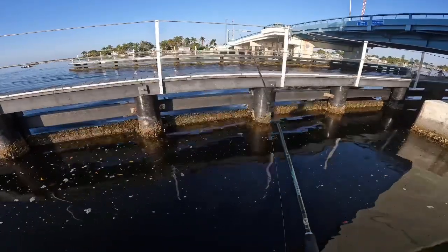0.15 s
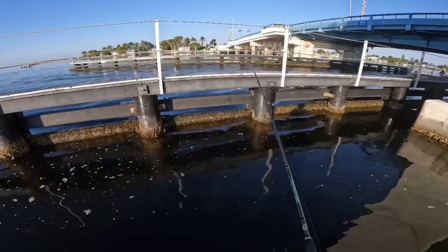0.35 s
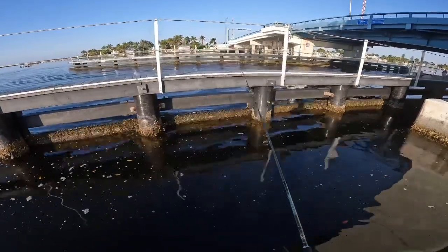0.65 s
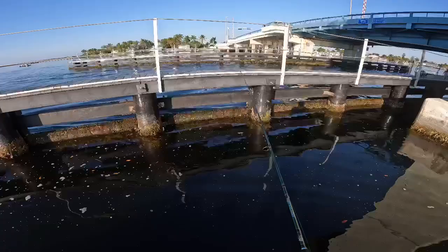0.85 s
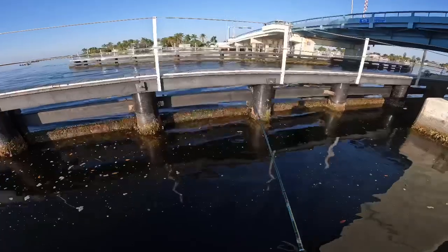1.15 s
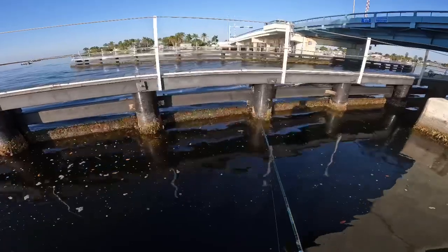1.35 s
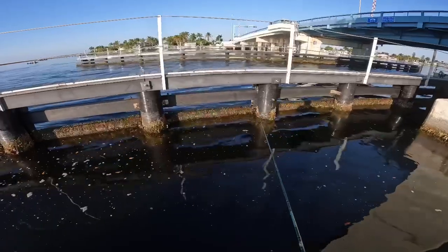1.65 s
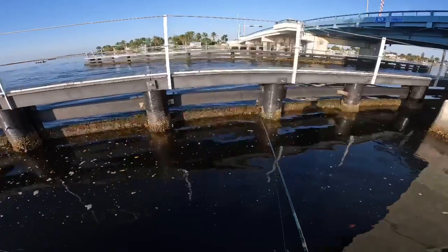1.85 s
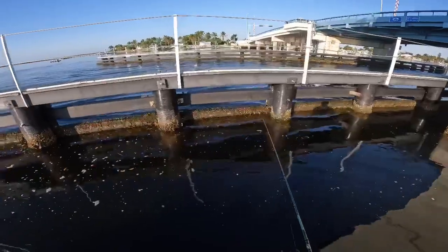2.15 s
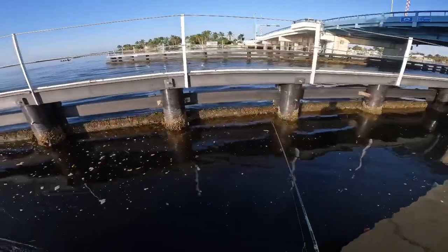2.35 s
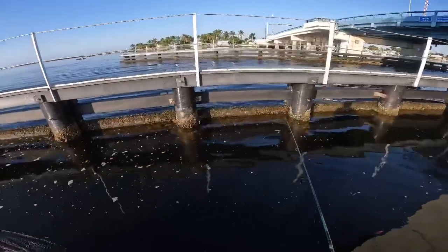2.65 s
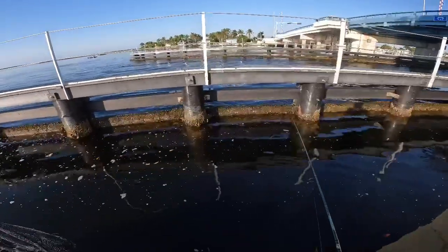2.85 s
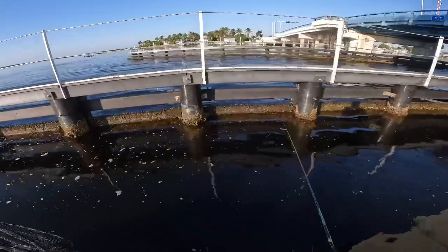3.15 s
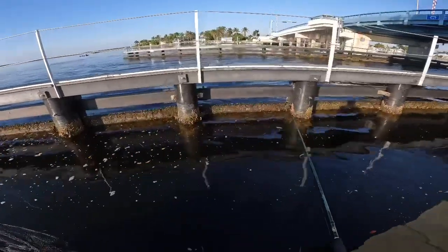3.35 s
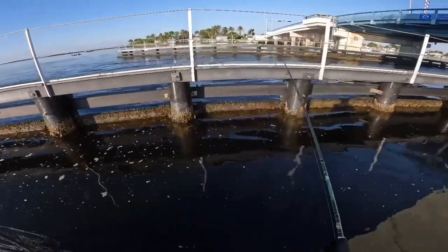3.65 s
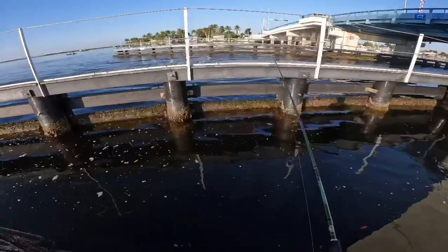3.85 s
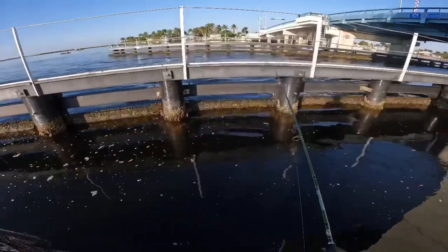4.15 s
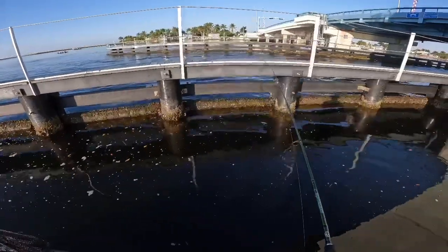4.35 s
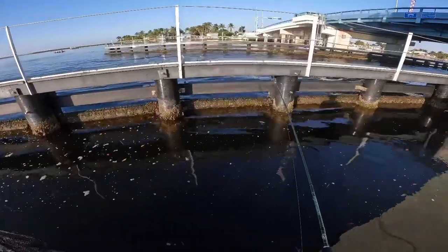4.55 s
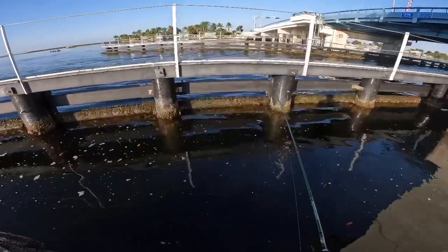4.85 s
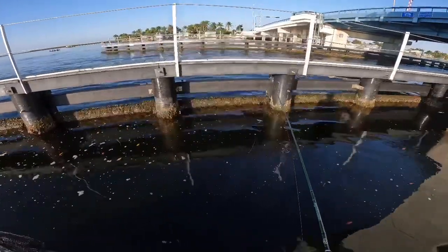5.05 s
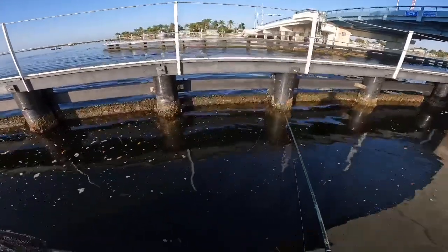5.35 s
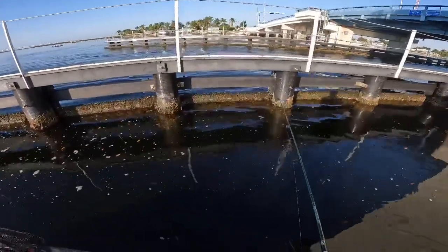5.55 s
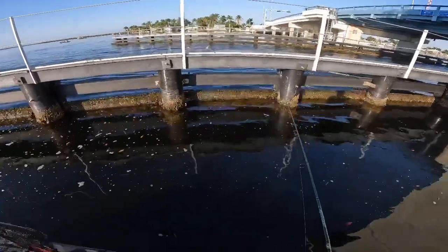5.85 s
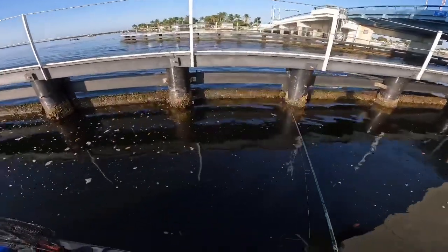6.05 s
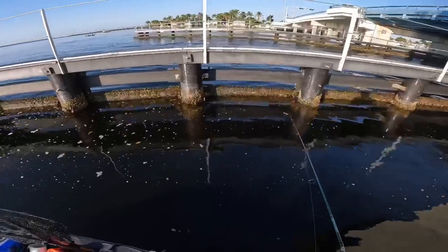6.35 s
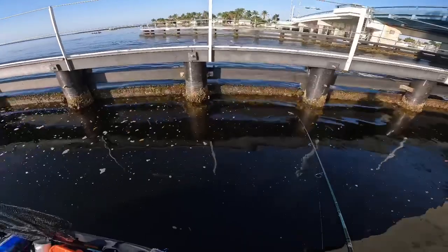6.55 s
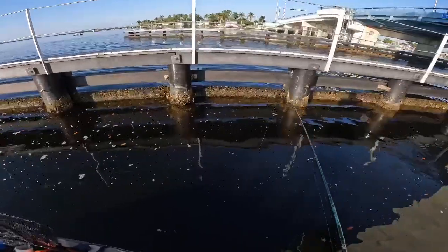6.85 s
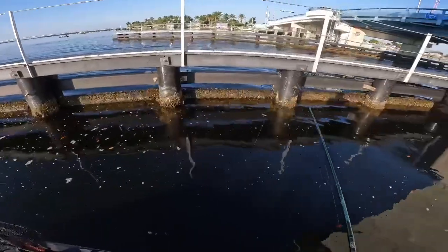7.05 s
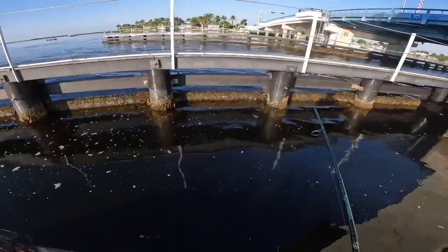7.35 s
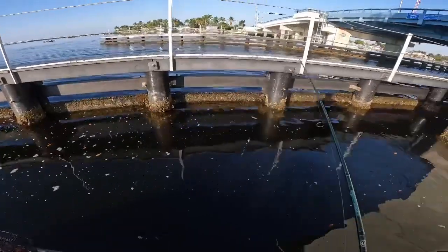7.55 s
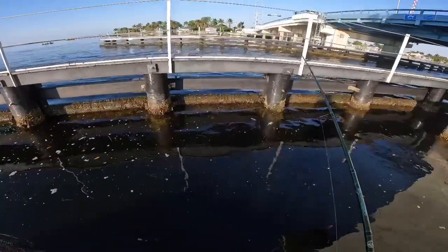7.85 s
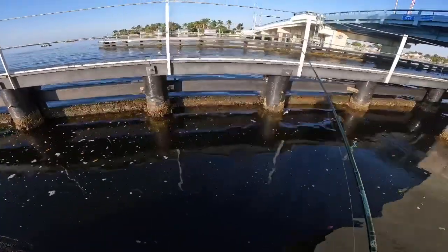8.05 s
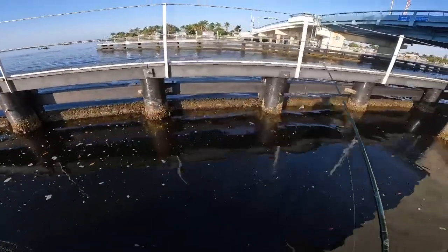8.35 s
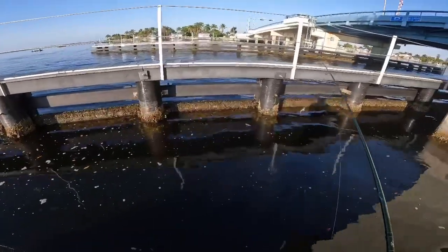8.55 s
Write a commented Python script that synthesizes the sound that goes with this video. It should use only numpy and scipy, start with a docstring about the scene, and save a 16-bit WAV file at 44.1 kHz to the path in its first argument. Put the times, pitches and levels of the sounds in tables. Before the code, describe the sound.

Outdoors at the waterside below a drawbridge, a vehicle is already crossing the steel grating, its tyres making a rough roar and a low, wavering hum while the deck booms. It rolls off at about 2 seconds, leaving a dull wash of distant traffic and a low throb from the steel; a soft, far tyre whine joins from 3 seconds. Close by, fishing tackle ticks faintly through the first 6 seconds, with a few very faint rasps of line early on. The water fizzes quietly and drips several times between 3.7 and 6.4 seconds. At about 6.6 seconds a second vehicle mounts the grating with a clap and a thud from each axle. Its roar and hum are louder and higher, with tyre hiss and slight metallic chatter near 8.3 seconds, then begin to fade. Light wind rumbles on the microphone throughout.

```python
"""Tyres roar and hum on the steel grating of a drawbridge, and the deck booms in its low modes.
The microphone stands at the waterside below, in a light wind. The first vehicle rolls off the span,
leaving a wash of far traffic, until a second mounts it with a clap and a thud from each axle.
Close by, the water fizzes and drips, and fishing tackle ticks and rasps faintly."""
import sys
import numpy as np
from scipy import signal
from scipy.fft import rfft, irfft, next_fast_len
from scipy.io import wavfile
from scipy.ndimage import uniform_filter1d

SR = 44100
rng = np.random.default_rng(int(sys.argv[2]) if len(sys.argv) > 2 else 0)


def dump_mix(stems):
    """Bounce the given channels to the path in sys.argv[1] as a 16-bit WAV at rate SR."""
    frames = np.atleast_2d(stems).T  # one column per channel
    limited = np.clip(frames, -1, 1)  # hard clip at full scale
    pcm = np.round(limited * 32767).astype(np.int16)
    wavfile.write(sys.argv[1], SR, pcm)


N = 383260
PADDED = next_fast_len(N)
TIME, FREQS = np.arange(N) / SR, np.fft.rfftfreq(PADDED, 1 / SR)

# Each vehicle overhead: front wheels enter in seconds, wheels leave in seconds, fade in dB per second.
FIRST_PASS, SECOND_PASS = (-0.59, 1.96, 17.7), (6.645, 8.36, 25.3)
AXLE_LAG_S, FRONT_SHARE = 0.28, 0.43  # delay of the rear axle; the front axle's share of the power
NEAREST_S = 8.31  # the second vehicle is closest to the microphone

# Tyres on the grating. Each row: frequency in Hz, relative spectral level in dB.
FIRST_TYRE_COLOUR = [(70, 0.5), (170, 3.5), (250, 1), (360, -4), (600, 1.5), (800, -5.5), (1050, -8),
                     (1400, -17.5), (1900, -18), (2700, -31.5), (4000, -58.5), (15000, -72)]
SECOND_TYRE_COLOUR = [(70, -12), (135, 6), (200, -2), (260, -1.5), (350, -2.5), (420, -2.5), (500, -4),
                      (560, 0.5), (615, -4.5), (670, -0.5), (820, -4.5), (940, -1), (1200, -4.5),
                      (1750, -7.5), (2300, -15.5), (3000, -30.5), (4500, -67), (15000, -76)]
# Speed across the span. Each row: time in seconds, grating bars struck per second.
FIRST_BAR_RATE = [(0, 92), (.7, 105.4), (2.5, 103.5)]
SECOND_BAR_RATE = [(6.6, 146.3), (7.05, 142.3), (7.25, 139.6), (7.45, 137.2), (7.799, 141.6), (8.1, 145.6),
                   (8.69, 146.1)]
# Harmonics of the hum. Each row: multiple of the bar rate, relative level in dB.
FIRST_HARMONICS = [(1, -7.5), (2, 3), (3, -4), (4, -5.5)]
SECOND_HARMONICS = [(1, -3), (2, 1.5), (3, -2), (4, -12.5)]
# Moans in the second hum. Each row: crest in seconds, half length in seconds, level in dB.
MOAN_SWELLS = [(7.13, 0.092, -33), (7.46, 0.069, -34.5), (8.1, 0.073, -33.5)]
# Shaking of the deck. Each row: time in seconds, girder level in dB, panel level in dB.
DECK_LEVELS = [(0.0, -30.5, -35), (0.15, -29.5, -30), (0.56, -33, -32.5), (0.68, -27.5, -30),
               (0.92, -27, -24), (1.06, -37.5, -35), (1.16, -30.5, -29.5), (1.6, -30, -31.5),
               (1.77, -41.5, -25.5), (2.0, -36, -30.5), (2.28, -30, -28), (2.5, -39, -29.5),
               (2.76, -27.5, -32), (3.03, -33, -35), (3.22, -40, -38), (3.45, -35, -35.5), (3.72, -37, -38),
               (3.92, -34.5, -36), (4.25, -33, -39.5), (4.68, -33.5, -33.5), (4.82, -37.5, -33),
               (5.1, -34, -37), (5.3, -39.5, -31.5), (5.52, -34.5, -41), (5.81, -36.5, -45),
               (6.02, -34.5, -29.5), (6.25, -34, -34.5), (6.4, -38.5, -41), (6.61, -34, -39),
               (6.83, -21.5, -24.5), (7.15, -25, -25), (7.45, -25, -30.5), (7.76, -32, -32),
               (7.93, -24.5, -25), (8.15, -31, -25), (8.35, -28, -25), (8.69, -29, -25)]
# Modes of the steel overhead. Each row: frequency in Hz, width in Hz, relative level in dB.
GIRDER_RESONANCES = [(47.3, 5.9, -4), (60.8, 6.2, -1), (75.4, 9.4, 0.5)]
PANEL_RESONANCES = [(96, 10, -15.5), (113, 11.5, -1.5), (132.4, 16, -7.5), (151, 7, -12.5)]
GRATING_RESONANCES = [(2520, 70, 4), (3030, 26, 0.5), (3640, 35, -5), (4240, 80, -7), (4680, 28, 3),
                      (5060, 70, -4.5), (5420, 40, -5), (5600, 45, -9.5), (6540, 70, -12),
                      (7040, 60, -10.5), (7330, 70, -10), (7770, 28, -13)]
# Rubber on the road. Each row: frequency in Hz, relative spectral level in dB.
HISS_COLOUR = [(1500, -20), (2800, 2.5), (3900, 2.5), (5100, 0.5), (5900, -7), (7400, -11), (8300, -19),
               (10400, -25.5), (12000, -39), (14500, -56)]
# Tackle close by. Each row: start in seconds, peak in dB, pitch in Hz, width as a share of the pitch,
# rattle against the peak in dB, left minus right in dB.
TACKLE_TICKS = [(.343, -45, 5100, .14, -5, 0), (1.178, -56, 10400, .15, -12, 0),
                (1.237, -60, 13600, .14, -12, 4), (1.713, -38, 4130, .26, -8, -2),
                (1.798, -47, 4490, .14, -15, -1), (2.120, -46, 3880, .16, -12, -3),
                (2.179, -45, 3950, .14, -14, -4), (2.375, -42.5, 5200, .14, -11, -3),
                (2.450, -44, 2550, .12, -4, 5), (2.461, -39, 3750, .25, -11, 9),
                (2.517, -44, 4730, .14, -15, 5), (2.535, -45, 3480, .2, -5, 6),
                (2.563, -42, 4280, .35, -5, 6), (2.772, -58, 13750, .15, -16, 6),
                (3.374, -51, 6330, .1, -12, 0), (3.499, -40, 5300, .26, -10, -4),
                (3.508, -44, 4870, .25, -7, -4), (3.941, -39, 3460, .26, -14, 0),
                (4.688, -39.5, 4820, 0.2, -13, -4), (4.824, -59, 11500, .16, -12, 0),
                (4.862, -39.5, 5100, 0.37, -9, 0), (4.973, -39, 6500, .36, -22, -1),
                (4.983, -49, 6100, .2, -6, -1), (5.022, -52, 8800, .3, -14, 0),
                (5.162, -55.5, 9700, .25, -8, 0), (5.920, -44, 4850, 0.4, -7, -1)]
# Rasps of the line. Each row: crest in seconds, half length in seconds, level in dB.
LINE_SWELLS = [(0.21, 0.02, -77), (0.31, 0.05, -75.5), (1.02, 0.08, -84), (1.23, 0.02, -80),
               (2.23, 0.03, -81), (2.54, 0.05, -79), (2.78, 0.02, -83)]
# Drips under the fender. Each row: start in seconds, bubble peak in dB, starting pitch in Hz.
FENDER_DRIPS = [(3.698, -36, 1170), (3.875, -45, 2830), (3.927, -44, 2780), (4, -35.5, 1130),
                (5.050, -43, 2160), (5.086, -37, 1140), (6.135, -42, 2400), (6.359, -39.5, 2120)]
# Surface and foam close by. Each row: frequency in Hz, relative spectral level in dB.
FIZZ_COLOUR = [(2000, -5.5), (3300, 1.5), (5200, 0.5), (6000, -1), (7400, -2.5), (8300, -10), (9400, -11.5),
               (10500, -10), (11200, -16), (12100, -16), (13500, -29), (14600, -53)]
# Traffic in the distance. Each row: frequency in Hz, relative spectral level in dB.
FAR_COLOUR = [(60, 1), (150, 4), (210, 5.5), (300, 0.5), (410, -1), (470, -5), (560, -6), (800, -6),
              (1020, -3.5), (1600, -8.5), (2100, -14.5), (3000, -24.5), (5000, -54.5), (15000, -66)]
# Whine of far tyres. Each row: frequency in Hz, width in Hz, relative level in dB.
WHINE_BANDS = [(705, 47, -3.5), (924, 42, 0)]
# Low rumble at the microphone. Each row: frequency in Hz, relative spectral level in dB.
RUMBLE_COLOUR = [(6, 5), (16, 3), (28, 5), (39, 10), (50, 9), (90, -17), (250, -38), (900, -73)]
# Its swells: three wind gusts and, at 6.9 s, the deck's short heave as the second vehicle lands.
# Each row: crest in seconds, half length in seconds, level in dB.
RUMBLE_SWELLS = [(0.2, 0.32, -32), (2.5, 0.86, -32.5), (6.915, 0.11, -25.5), (7.9, 1.2, -32.5)]
# The microphone's two ports. Each row: frequency in Hz, likeness from 0 to 1,
# lead of the left in radians, left minus right in dB.
MIC_PORTS = [(200, 1, 0, 0), (330, .996, 0, -1.1), (900, .98, -.15, -.6), (1500, .93, -.45, -.3),
             (2200, .85, -.9, -1.4), (2950, .66, -1.3, -1.5), (3500, .62, -.55, -1.5),
             (4800, .82, -.1, -1.2), (8000, .58, .25, .6), (10600, .75, 0, 1.5), (13000, .25, 0, 3)]


def tyres(vehicle, colour, roar_db, rasp_db, rattle_db, sag_db_per_s, split_hz=850):
    """Tyres drum on the grating overhead: a dark, sagging roar and a bright rasp, rattling together."""
    shape = gain_of(over_freq(colour))
    dark_share = 1 / (1 + (FREQS / split_hz) ** 8)
    sag_db = sag_db_per_s * np.maximum(TIME - vehicle[0], 0)
    roar = noise(shape * np.sqrt(dark_share)) * gain_of(roar_db - sag_db)
    roar *= crossing(vehicle, rise_s=0.037)
    rasp = reflected(noise(shape * np.sqrt(1 - dark_share))) * gain_of(rasp_db)
    rasp *= crossing(vehicle, rise_s=0.047)
    return (roar + rasp) * gain_of(rattle_db * drift(34))


def hum(vehicle, bar_rate, harmonics, level_db, rise_s, linger_s, wander, waver_db=3):
    """Four wheels strike the bars at an unsteady rate and force, smearing the harmonics into bands."""
    out = np.zeros(N)
    for _ in range(4):
        unsteady = 0.6 * drift(5.005) + 1.197 * drift(40.56)
        cycles = np.cumsum(over_time(bar_rate) * (1 + wander * unsteady)) / SR
        for multiple, db in harmonics:
            force = gain_of(db + waver_db * drift(37))
            out += force * np.sin(2 * np.pi * (multiple * cycles + rng.random()))
    return unit_rms(out) * gain_of(level_db) * crossing(vehicle, rise_s, linger_s) * pan(-1)


def moan(harmonic=4, wander=0.0222, waver_db=2.5):
    """One harmonic of the second vehicle's hum stands out now and then."""
    cycles = harmonic * np.cumsum(over_time(SECOND_BAR_RATE) * (1 + wander * drift(41.4))) / SR
    level = np.sqrt(swell_power(MOAN_SWELLS)) * gain_of(waver_db * drift(25))
    return unit_rms(np.sin(2 * np.pi * cycles)) * level * pan(-1)


def axle_thuds():
    """Each axle of the second vehicle mounts the steel with a clap and a thud, the heavier one harder."""
    out = np.zeros((2, N))
    for lag_s, share in ((0, FRONT_SHARE), (AXLE_LAG_S, 1 - FRONT_SHARE)):
        clap = burst(db=-32, hz=640, t60_s=0.23, spread=0.34)
        thud = burst(db=-25, hz=66, t60_s=0.23, spread=0.33)
        add(out, SECOND_PASS[0] + lag_s, 2 * share * (clap + thud))
    return out


def deck(panel_trim_db=-0.38, throb_db=1.66):
    """Rolling wheels shake the girders and panels above the microphone, which throb unevenly."""
    girders = shaken_steel(GIRDER_RESONANCES, over_time(DECK_LEVELS, 1))
    girders *= gain_of(throb_db * drift(21))
    panels = shaken_steel(PANEL_RESONANCES, over_time(DECK_LEVELS, 2) + panel_trim_db)
    panels *= gain_of(throb_db * drift(6.4))
    return girders + panels


def shaken_steel(modes, level_db, calm_below_db=-27, blend_db=11):
    """Under load the modes are driven into broad bands; left to themselves they ring as narrow tones."""
    driven = unit_rms(noise(resonances(modes)))
    narrow_modes = [(hz, 0.3 * width, 2 * db) for hz, width, db in modes]
    ringing = steadied(noise(resonances(narrow_modes)), window_s=0.75)
    load_db = uniform_filter1d(level_db, SR // 2)
    calm = np.clip((calm_below_db - load_db) / blend_db, 0, 0.8)
    blend = np.sqrt(calm) * ringing + np.sqrt(1 - calm) * driven
    return steadied(blend, window_s=0.19) * gain_of(level_db)


def road_hiss(far_db=-66, first_db=-61, second_db=-56.5, chatter_db=-57, pulse_hz=15.75, crest_s=8.342):
    """Rubber hisses on after the roar; as the second vehicle nears, it pulses and the steel chatters."""
    first = gain_of(first_db) * crossing(FIRST_PASS, rise_s=0.053, linger_s=0.064)
    pulse_depth_db = 3.5 * nearness(half_s=0.27) ** 2
    pulse = gain_of(pulse_depth_db * np.cos(2 * np.pi * pulse_hz * (TIME - crest_s)))
    drive = crossing(SECOND_PASS, rise_s=0.053, linger_s=0.12) * pulse
    second = gain_of(second_db) * drive * nearness(half_s=1.6)
    level = np.sqrt(gain_of(far_db) ** 2 + first ** 2 + second ** 2)
    hiss = noise(gain_of(over_freq(HISS_COLOUR))) * level * gain_of(drift(25))  # flutters by 1 dB
    return hiss + grating_chatter() * gain_of(chatter_db) * drive * nearness(half_s=0.18)


def grating_chatter(rough_db=2.5, rough_hz=110):
    """The grating's thin modes, kept ringing by the tyres and shaken in pitch and strength."""
    out = np.zeros(N)
    for hz, width, db in GRATING_RESONANCES:
        cycles = np.cumsum(hz + width * drift(rough_hz)) / SR
        out += gain_of(db + rough_db * drift(rough_hz)) * np.sin(2 * np.pi * cycles)
    return unit_rms(out)


def tackle(handled_s=6, faint_count=70):
    """Close by, line and rod snap and rattle; tiny high ticks fall between while the rod is handled."""
    out = np.zeros((2, N))
    for start_s, db, hz, width, rattle_db, left_db in TACKLE_TICKS:
        snap = ping(db, hz, width)
        rattle = burst(db + rattle_db, hz, t60_s=0.044, spread=0.34)
        add(out, start_s, (snap + rattle) * pan(left_db))
    for when, size, height in rng.random((faint_count, 3)):
        add(out, when * handled_s, ping(db=-70 + 10 * size, hz=9000 + 3500 * height, width=0.14))
    return out


def line_rasps(centre_hz=13200, width_hz=2100, slips_per_s=650, spread_db=4.4):
    """A little to the left, line slides through the fingers in airy rasps of slips, most of them tiny."""
    sizes = gain_of(spread_db * np.minimum(rng.exponential(1, N), 4))
    slips = sizes * rng.choice([-1, 1], N) * (rng.random(N) < slips_per_s / SR)
    at_ports = unit_rms(slips * rng.uniform(0.5, 1, (2, N)))
    rasps = at_ports * np.sqrt(swell_power(LINE_SWELLS))
    airy_band = unit_rms(resonances([(centre_hz, width_hz, 0)]))
    return irfft(rfft(rasps, PADDED) * airy_band, PADDED)[:, :N] * pan(6)


def water(fizz_db=-62.5, settle_db_per_s=0.46, sparkle_db=0.5):
    """The surface fizzes close by; each drip makes a splash and a bubble that rings, rising in pitch."""
    out = noise(gain_of(over_freq(FIZZ_COLOUR)))
    out *= gain_of(fizz_db - settle_db_per_s * TIME + sparkle_db * drift(30))
    for start_s, db, hz in FENDER_DRIPS:
        bubble = ping(db, hz, width=0.16, glide_per_s=8)
        splash = burst(db - 6, hz, t60_s=0.068, spread=0.27)
        add(out, start_s, bubble + splash)
    return out


def far_traffic(wash_db=-40.33, swell_db=0.2, whine_db=-49, waver_db=2, whine_from_s=3.03):
    """Distant tyres make a dull, nearly steady wash, joined by a soft, wavering whine."""
    wash = noise(gain_of(over_freq(FAR_COLOUR))) * gain_of(wash_db + swell_db * drift(5.9))
    whine = noise(resonances(WHINE_BANDS)) * gain_of(whine_db + waver_db * drift(5.5))
    return wash + whine * rising(whine_from_s, rise_s=0.35)


def wind_and_heave(breeze_db=-43.5):
    """Low rumble: breeze and three gusts on the microphone, and the deck's heave as a vehicle lands."""
    rumble = steadied(noise(gain_of(over_freq(RUMBLE_COLOUR))), window_s=0.58)
    return rumble * np.sqrt(gain_of(breeze_db) ** 2 + swell_power(RUMBLE_SWELLS))


def reflected(pair, echo_db=-15.5, spread_s=0.045, count=12):
    """Piers, fender and water add a few early echoes, which ripple the spectrum finely."""
    out = pair.copy()
    echo = pair * gain_of(echo_db) / np.sqrt(count)
    for when, polarity in rng.random((count, 2)):
        add(out, (0.1 + when) * spread_s, echo * np.sign(polarity - 0.5))
    return out


def crossing(vehicle, rise_s, linger_s=0):
    """Gain of a vehicle on the grating: a step up for each axle, a hold, then a fade as it leaves."""
    enters_s, leaves_s, fade_db_per_s = vehicle
    front = FRONT_SHARE * rising(enters_s, rise_s) ** 2
    rear = (1 - FRONT_SHARE) * rising(enters_s + AXLE_LAG_S, rise_s) ** 2
    return np.sqrt(front + rear) * gain_of(-fade_db_per_s * np.maximum(TIME - leaves_s - linger_s, 0))


def nearness(half_s):
    """One over the second vehicle's distance from the microphone, 1 when nearest."""
    return 1 / np.hypot(1, (TIME - NEAREST_S) / half_s)


def burst(db, hz, t60_s, spread):
    """One contact or drop: a short burst of noise around a pitch, mostly alike at both ports."""
    t, freqs = np.arange(8192) / SR, np.fft.rfftfreq(8192, 1 / SR)
    band = np.exp(-(np.log((freqs + 1) / hz) / spread) ** 2)
    shared, left, right = irfft(rfft(rng.standard_normal((3, len(t)))) * band)
    onset = 1 - np.exp(-t / (0.045 * t60_s))
    return unit_rms(shared + 0.5 * np.array([left, right])) * onset * gain_of(db - 60 * t / t60_s)


def ping(db, hz, width, glide_per_s=0):
    """A few cycles of a centred tone that swell and die; the wider its band, the shorter it rings."""
    t = np.arange(8192) / SR
    age = np.pi * hz * width * t
    tone = np.sin(2 * np.pi * hz * (t + glide_per_s * t ** 2 / 2))
    return tone * age * np.exp(1 - age) * gain_of(db) * pan(0)


def noise(shape):
    """Coloured noise as the two ports hear it; their mean has rms 1."""
    left, other = rng.standard_normal((2, len(FREQS))) + 1j * rng.standard_normal((2, len(FREQS)))
    likeness, lead = over_freq(MIC_PORTS, 1), over_freq(MIC_PORTS, 2)
    lean = gain_of(over_freq(MIC_PORTS, 3) / 2)
    right = (likeness * left + np.sqrt(1 - likeness ** 2) * other) * np.exp(-1j * lead)
    spectra = np.array([left * lean, right / lean]) * shape / np.sqrt(1 + likeness * np.cos(lead))
    pair = irfft(spectra, PADDED)[:, :N]
    return pair / pair.mean(0).std()


def steadied(pair, window_s):
    """Evens out the slow swells of a narrow noise."""
    power = signal.oaconvolve(pair.mean(0) ** 2, np.hanning(int(window_s * SR)), "same")
    return unit_rms(pair / np.sqrt(abs(power) + 1e-9))


def drift(rate_hz, size=8192):
    """Smooth random motion of rms 1, up to about the given rate."""
    hz = np.fft.rfftfreq(size, TIME[-1] / size)
    slow = irfft(rfft(rng.standard_normal(size)) * np.exp(-(hz / rate_hz) ** 2))
    return np.interp(TIME, np.linspace(0, TIME[-1], size), unit_rms(slow))


def resonances(modes):
    """Gain over frequency of a set of modes."""
    return sum(gain_of(db) / (1 + ((FREQS - hz) / width) ** 2) for hz, width, db in modes)


def swell_power(rows):
    """Power over time of a set of smooth swells."""
    return sum(gain_of(db) ** 2 * np.exp(-((TIME - s) / half_s) ** 2) for s, half_s, db in rows)


def rising(start_s, rise_s):
    """Gain that builds from 0 to 1."""
    return 1 - np.exp(-np.maximum(TIME - start_s, 0) / rise_s)


def over_freq(rows, column=1):
    """A table's column at every frequency, joined on a log axis."""
    table = np.transpose(rows)
    return np.interp(np.log(FREQS + 1), np.log(table[0] + 1), table[column])


def over_time(rows, column=1):
    """A table's column at every sample."""
    table = np.transpose(rows)
    return np.interp(TIME, table[0], table[column])


def add(mix, start_s, sound):
    """Adds a sound to the mix at a time."""
    part = mix[:, round(start_s * SR):][:, :sound.shape[1]]
    part += sound[:, :part.shape[1]]


def pan(left_db):
    """Two gains that put the left this far above the right."""
    return gain_of([[left_db / 2], [-left_db / 2]])


def gain_of(db):
    """Decibels to gain."""
    return 10 ** (np.asarray(db) / 20)


def unit_rms(x):
    """Scales to rms 1."""
    return x / np.sqrt(np.mean(x ** 2) + 1e-20)


def scene():
    """From the waterside: two vehicles overhead, small sounds close by, far traffic and wind behind."""
    first = tyres(FIRST_PASS, FIRST_TYRE_COLOUR,
                  roar_db=-32.5, rasp_db=-43.5, rattle_db=1.5, sag_db_per_s=1.37)
    first += hum(FIRST_PASS, FIRST_BAR_RATE, FIRST_HARMONICS,
                 level_db=-36.5, rise_s=0.23, linger_s=0.036, wander=0.02815)
    second = tyres(SECOND_PASS, SECOND_TYRE_COLOUR,
                   roar_db=-28, rasp_db=-37.5, rattle_db=0.73, sag_db_per_s=1.1)
    second += hum(SECOND_PASS, SECOND_BAR_RATE, SECOND_HARMONICS,
                  level_db=-30, rise_s=0.36, linger_s=0.093, wander=0.036)
    traffic = first + second + deck() + moan() + axle_thuds() + far_traffic()
    return traffic + reflected(road_hiss() + water()) + wind_and_heave() + tackle() + line_rasps()


def record(dry):
    """The recorder passes sound up to 15.7 kHz; both ends are softly faded."""
    low_pass = signal.ellip(10, 0.05, 60, 15700, fs=SR, output="sos")
    return signal.sosfiltfilt(low_pass, dry * signal.windows.tukey(N, 0.001))


dry = scene()
out = record(dry)
dump_mix(out)
```